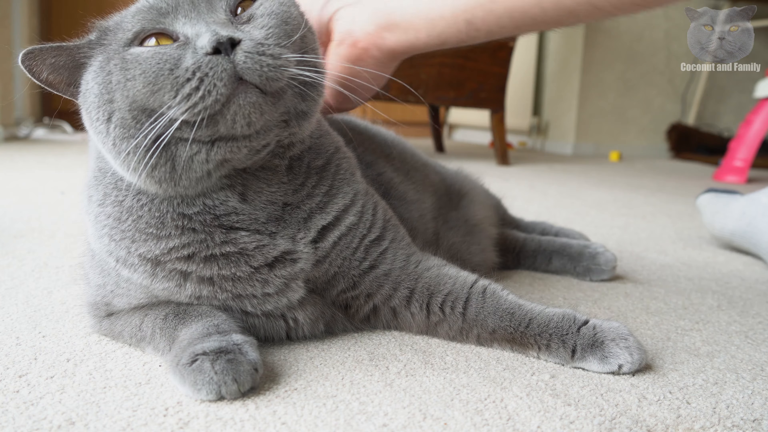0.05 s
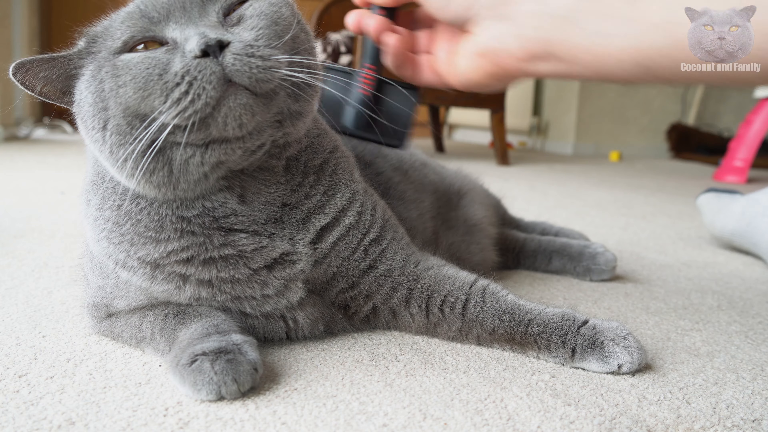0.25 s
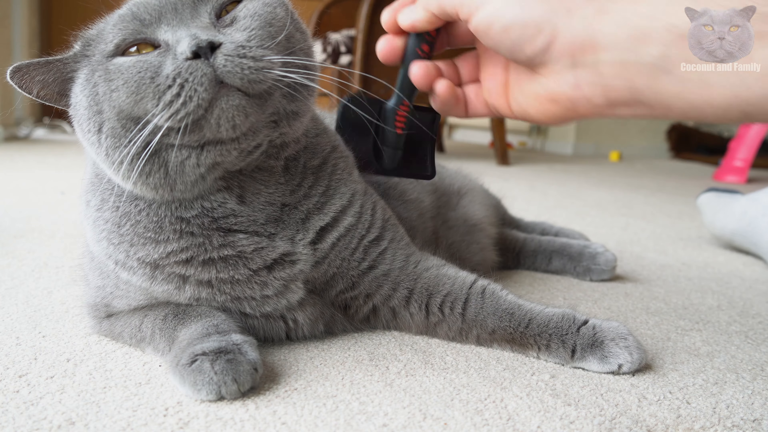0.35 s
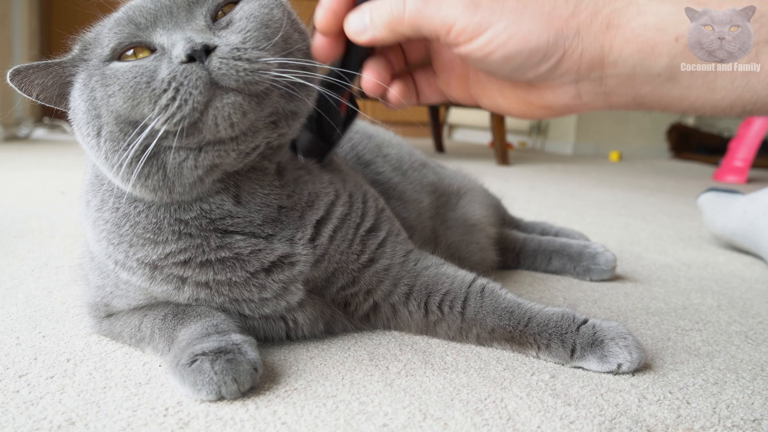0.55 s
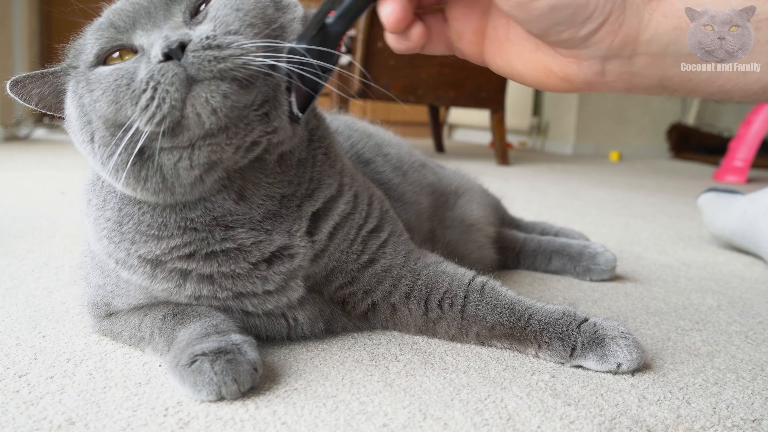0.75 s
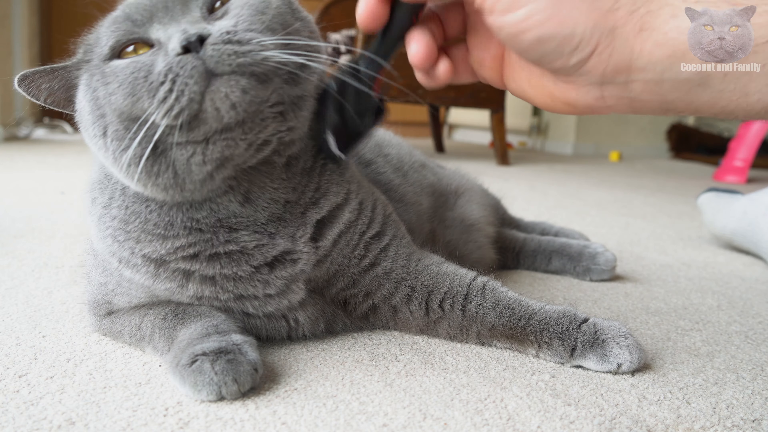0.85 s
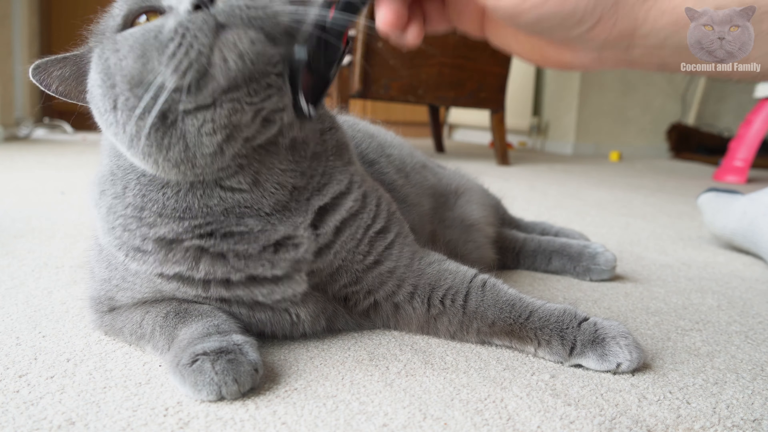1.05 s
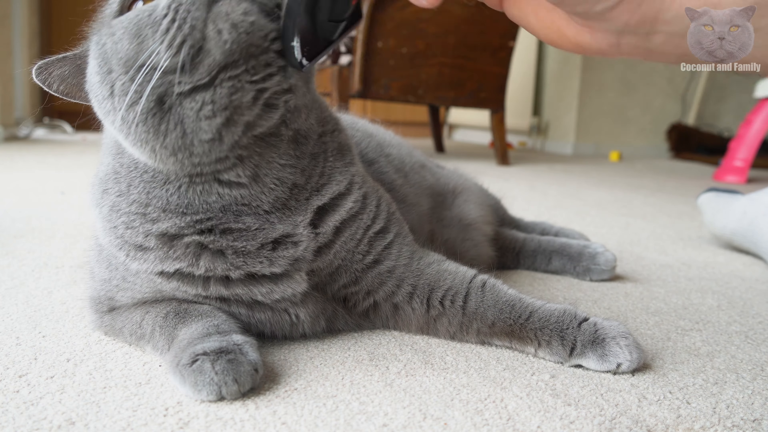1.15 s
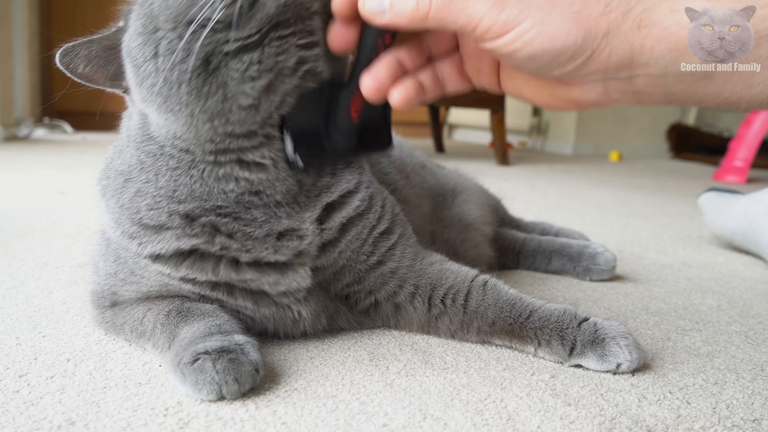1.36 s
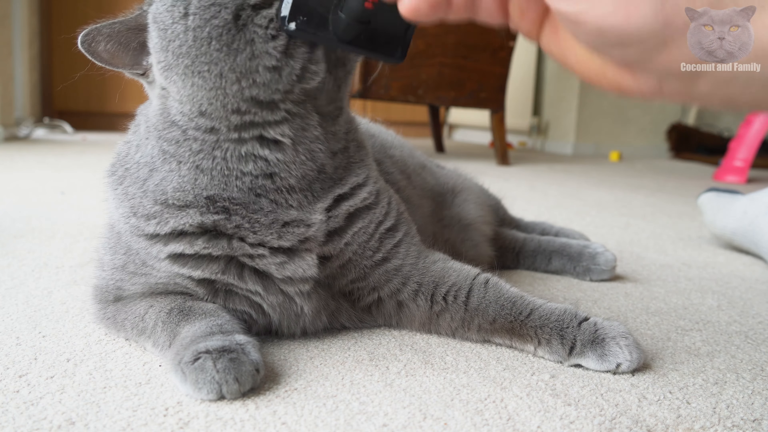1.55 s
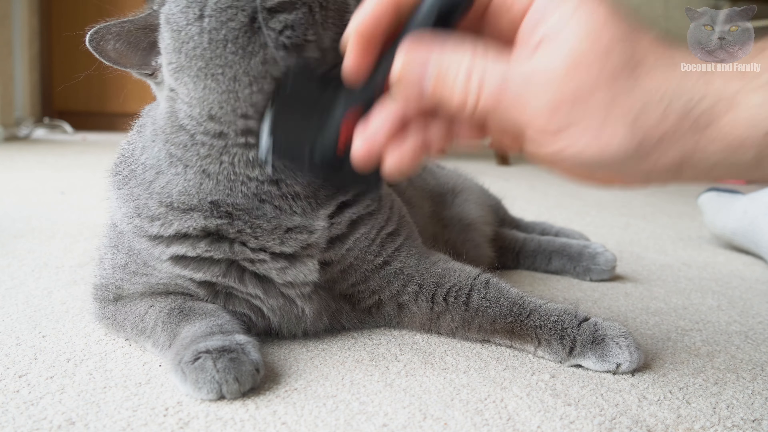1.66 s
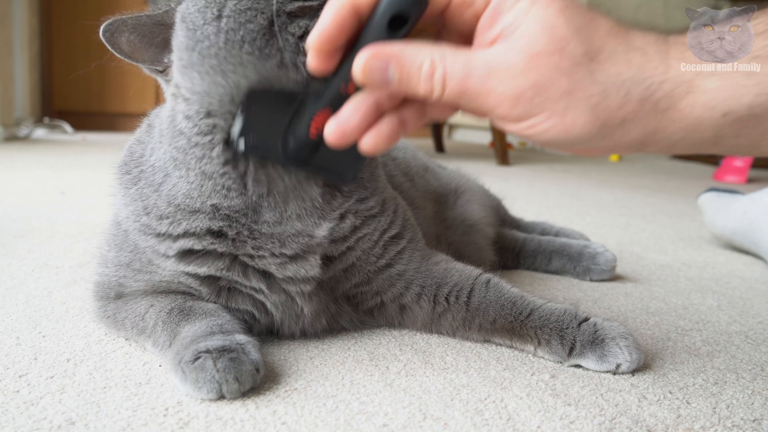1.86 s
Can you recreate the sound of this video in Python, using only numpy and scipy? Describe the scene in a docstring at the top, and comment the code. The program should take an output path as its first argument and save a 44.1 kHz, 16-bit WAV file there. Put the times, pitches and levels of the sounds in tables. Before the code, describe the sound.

A cat purrs close up, soft throbs turning rough and crackly, while a brush swishes through fur

```python
"""In a quiet room, a purring cat is brushed close to the microphone. The purr throbs softly as rounded low
pulses, fades, then turns round into a rougher half: each cycle there opens with one snap and closes with
another, amid flutter and a fine crackle. Bristles swish through the fur as swelling noise, the brush ticks
once, and a faint whistle wavers. The moving arm stirs a low rumble of filtered noise over steady hiss."""
import sys
import numpy as np
from scipy import signal
from scipy.fft import rfft, irfft
from scipy.io import wavfile
from scipy.ndimage import uniform_filter1d

SR = 44100
rng = np.random.default_rng(int(sys.argv[2]) if len(sys.argv) > 2 else 0)


def waveform_to_disk(signal):
    """Save audio, clipped to [-1, 1], as 16-bit WAV at the path in sys.argv[1]."""
    frames = np.transpose(np.atleast_2d(signal))
    scaled = np.clip(frames, -1, 1) * 32767
    samples = np.round(scaled).astype(np.int16)
    wavfile.write(sys.argv[1], SR, samples)


N = 83790  # samples in the scene

# Every colour table lists the points of a tone curve: pitch_hz, level_db

# Soft half of the purr, mean strength of the pushes: time_s, level_db
SOFT_LEVEL = [(0, -34), (.1, -32.5), (.2, -33), (.33, -38), (.455, -36), (.495, -44), (.535, -47),
              (.575, -64), (.66, -70), (.76, -45.5), (.86, -52), (.92, -48)]
# Soft push muffled by chest and fur: pitch_hz, level_db
SOFT_COLOUR = [(20, -15), (50, -7.5), (80, -5), (125, 1), (160, -4.5), (205, -10), (260, -16), (320, -23),
               (420, -38), (800, -77)]
SOFT_START_S, SOFT_END_S, SOFT_RATE_HZ = 0.02158, 1, 25.4

# Pace of the rough half of the purr: time_s, rate_hz
ROUGH_RATE = [(.94, 28.3), (1.02, 25.9), (1.13, 27.4), (1.23, 25.1), (1.29, 29.8), (1.46, 24.6),
              (1.57, 29.2), (1.7, 23.6), (1.79, 29.7), (1.84, 20.9)]
# Effort of the rough half: time_s, level_db, flutter_db (flutter relative to level_db)
ROUGH_EFFORT = [(.93, -40.5, -22), (1.0, -47, -10), (1.12, -42, -10.5), (1.26, -40, -5), (1.41, -44, -3.5),
                (1.55, -39.5, -6.5), (1.67, -35.5, -7.5), (1.8, -36.5, -18.5), (1.9, -39, -32)]
# Wait from the opening of the folds to their closing: time_s, wait_s
CLOSING_WAIT = [(.94, .014), (1.0, .02), (1.24, .0175), (1.29, .012), (1.48, .021), (1.6, .019),
                (1.68, .012), (1.72, .018), (1.76, .0135)]
# Ring of throat and chest after a closing snap: pitch_hz, level_db
THROAT_COLOUR = [(30, -35), (70, -10.5), (110, 4), (135, 2.5), (260, -4.5), (350, -11.5), (730, -19.5),
                 (1200, -26.5), (1800, -43), (3500, -57), (8000, -58)]
# Ring of the opening snap and the flutter: pitch_hz, level_db
FLUTTER_COLOUR = [(40, -26), (120, 1), (190, 2), (270, 4), (350, -8.5), (480, -13.5), (800, -27.5),
                  (1300, -24.5), (2000, -36), (6000, -68)]
# Low thump of each puff of air: pitch_hz, level_db
PUFF_COLOUR = [(25, -15), (60, -14.5), (110, 2.5), (170, 2), (260, -11), (500, -54), (1500, -93)]
ROUGH_START_S = .936
OPENING_DB, PUFF_DB = -8.5, -3  # relative to the effort
PUFF_LAG_S = 0.0036
SNAP_SCATTER_DB, FLUTTER_SCATTER_DB = 4.5, 2
FLUTTER_LAGS_S, FLUTTER_JITTER_S = (.007, .02, .025, .031), 0.00161

# Sharpest snaps of the larynx: start_s, crack_db, knock_db
SHARP_SNAPS = [(0.937, -38.5, -44.5), (.95, -52, -42.5), (0.968, -48, -56), (1.007, -50, -45),
               (1.047, -55, -39), (1.192, -44, -40.5), (1.276, -37.5, -53), (1.304, -59, -49.5),
               (1.38, -42.5, -45), (1.454, -44.5, -48), (1.516, -48, -51), (1.665, -53, -51),
               (1.681, -55, -43), (1.736, -45, -47), (1.795, -39.5, -47), (1.829, -33, -50),
               (1.874, -41, -48), (1.898, -37.5, -55)]
# Bright crack of a sharp snap: pitch_hz, level_db
CRACK_COLOUR = [(100, -20), (300, -1.5), (800, 9), (1600, 2), (2200, -18), (3500, -4), (5000, -45),
                (10000, -60)]
# Dull knock of a sharp snap: pitch_hz, level_db
KNOCK_COLOUR = [(50, -20), (170, -7.5), (300, 2), (400, -8), (600, -27), (1200, -21), (4000, -98)]

# Fine crackle in the rough purr, mean strength of the clicks: time_s, level_db
CRACKLE_LEVEL = [(.95, -66), (1.1, -59), (1.33, -52), (1.5, -48.5), (1.69, -50.5), (1.78, -51), (1.9, -44)]
# Ring of one crackle click: pitch_hz, level_db
CRACKLE_COLOUR = [(100, -22), (250, -8), (450, -1), (750, 6.5), (1000, -1.5), (1400, -7.5), (2200, -24),
                  (6000, -73)]
CRACKLE_RATE_HZ, CRACKLE_SCATTER_DB = 60, 2

# Brush strokes: fastest_s, rise_s, fall_s, hiss_db, rasp_db, rasp_hz (centre of the low rasp)
STROKES = [(.01, 0.039, 0.084, -59.5, -60, 1570), (.52, 0.14, 0.27, -67, -70, 1380),
           (.675, .015, 0.021, -75, -63, 2380), (.79, 0.033, 0.03, -61.5, -66, 2180),
           (1.169, 0.037, 0.031, -50.5, -56, 1420), (1.582, 0.047, 0.03, -51, -55, 1590),
           (1.7, 0.048, 0.032, -61.5, -74, 1700)]
# Hiss of bristles in fur: pitch_hz, level_db
BRISTLE_COLOUR = [(1200, -18), (2500, -13), (2950, -4.5), (3500, 1), (4200, -6), (5500, -10), (7000, -20.5),
                  (10000, -28), (15000, -35)]
RASP_STEP_OCTAVES = 0.44  # spacing of the points on the rasp's tone curve
GRAIN_DB, UNEVEN_DB = 1.5, .7  # spread of the fast and the slower wobble in level

# Plastic tick of the brush: pitch_hz, level_db
TICK_COLOUR = [(600, -40), (1600, 2), (2500, -9), (3800, -4), (5200, -3), (7000, -12), (9000, -28),
               (14000, -36)]
# Bright scuff around the tick: pitch_hz, level_db
SCUFF_COLOUR = [(1500, -32), (3000, 1), (4500, 3), (6200, -5), (8000, -15), (14000, -30)]
TICK_S, TICK_DB, TICK_DECAY_S = .255, -36.5, 0.001
SCUFF_DB, SCUFF_LENGTH_S = -57.5, 0.031

WHISTLE_S, WHISTLE_LENGTH_S, WHISTLE_HZ, WHISTLE_DB = .57, 0.099, 1350, -65

# Strength of the low rumble: time_s, level_db
RUMBLE_LEVEL = [(0, -37.5), (.1, -48), (.16, -34.5), (.22, -19.5), (.28, -29.5), (.325, -18), (.39, -31),
                (.44, -29), (.48, -48), (.53, -25.5), (.645, -46.5), (.715, -34), (.81, -49.5),
                (1.15, -46.5), (1.42, -58.5), (1.55, -52), (1.7, -66), (1.9, -51)]
# Air stirred at the microphone: pitch_hz, level_db
RUMBLE_COLOUR = [(5, -8), (12, -6.5), (19, -0.5), (30, -13), (50, -23.5), (70, -36), (120, -39), (300, -84)]
# Steady hiss of the room: pitch_hz, level_db
ROOM_COLOUR = [(25, -13), (60, 0), (120, -8.5), (225, -19), (546, -26), (1290, -28), (2490, -28),
               (3490, -26.5), (4500, -28.5), (8000, -30), (15500, -31.5)]
ROOM_DB = -51
TOP_HZ = 15700  # highest pitch the recorder lets through


def undb(db):
    """Decibels to gain."""
    return 10 ** (np.asarray(db) / 20)


def curve(table, t, column=1):
    """One column of a table, joined by straight lines in time."""
    rows = np.array(table)
    return np.interp(t, rows[:, 0], rows[:, column])


def gains(colour):
    """Gain at every frequency, joining the colour's points on a logarithmic pitch scale."""
    hz, db = np.array(colour).T
    bins_hz = np.arange(N // 2 + 1) * SR / N
    return undb(np.interp(np.log(bins_hz + 1), np.log(hz), db))


def noise(colour):
    """Coloured noise of rms 1."""
    x = irfft(rfft(rng.standard_normal(N)) * gains(colour), N)
    return x / x.std()


def walk(rate_hz):
    """Smooth chance with a spread of 1: random steps at the given rate, rounded off."""
    step = int(SR / rate_hz)
    steps = np.repeat(rng.standard_normal(N // step + 1), step)
    x = uniform_filter1d(steps, step)[:N]
    return x / x.std()


def pulses(times, db):
    """Single-sample pulses at the given times and levels."""
    at = (np.asarray(times) * SR).astype(int)
    return np.bincount(np.maximum(at, 0), undb(db), N)[:N]


def ring(x, colour):
    """Pass pulses through a body with the given colour; a unit pulse peaks at 1."""
    # Folding the cepstrum gives minimum phase: the body rings only after it is struck
    cepstrum = irfft(np.log(gains(colour)), N)
    cepstrum[1:N // 2] *= 2
    cepstrum[N // 2 + 1:] = 0
    response = irfft(np.exp(rfft(cepstrum)), N)
    return signal.fftconvolve(x, response / np.abs(response).max())[:N]


def soft_purr():
    """Rounded, even pushes of the larynx, muffled by chest and fur."""
    times = np.arange(SOFT_START_S, SOFT_END_S, 1 / SOFT_RATE_HZ)
    scatter_db = rng.standard_normal(len(times))
    pushes = pulses(times, curve(SOFT_LEVEL, times) + scatter_db)
    # A symmetrical response swells before each push as it fades after it
    response = np.roll(irfft(gains(SOFT_COLOUR), N), N // 2)
    return -signal.fftconvolve(pushes, response / response.max(), "same")


def rough_purr():
    """Each cycle the folds snap open, let a puff through, flutter and snap shut."""
    times = [ROUGH_START_S]
    while times[-1] < N / SR:
        times.append(times[-1] + 1 / curve(ROUGH_RATE, times[-1]))
    times = np.array(times)
    effort_db = curve(ROUGH_EFFORT, times)
    flutter_db = effort_db + curve(ROUGH_EFFORT, times, column=2)

    def chance():
        return rng.standard_normal(len(times))

    opening = pulses(times, effort_db + OPENING_DB + SNAP_SCATTER_DB * chance())
    closing_times = times + curve(CLOSING_WAIT, times)
    closing = pulses(closing_times, effort_db + SNAP_SCATTER_DB * chance())
    puffs = pulses(times + PUFF_LAG_S, effort_db + PUFF_DB)
    flutter = np.zeros(N)
    for lag_s in FLUTTER_LAGS_S:
        flutter_times = times + lag_s + FLUTTER_JITTER_S * chance()
        flutter += pulses(flutter_times, flutter_db + FLUTTER_SCATTER_DB * chance())
    low = ring(closing, THROAT_COLOUR) + ring(puffs, PUFF_COLOUR)
    return -low - ring(opening + flutter, FLUTTER_COLOUR)


def sharp_snaps():
    """The sharpest snaps of the larynx: a bright crack and a dull knock of opposite polarity."""
    times, crack_db, knock_db = np.array(SHARP_SNAPS).T
    cracks = ring(pulses(times, crack_db), CRACK_COLOUR)
    knocks = ring(pulses(times, knock_db), KNOCK_COLOUR)
    return cracks - knocks


def crackle():
    """Small irregular clicks among the snaps of the rough purr, one at random in each time slot."""
    slots = np.arange(N // 100)
    times = ROUGH_START_S + (slots + rng.random(len(slots))) / CRACKLE_RATE_HZ
    chance = np.sqrt(12) * (rng.random(len(slots)) - .5)  # even chance with a spread of 1
    db = curve(CRACKLE_LEVEL, times) + CRACKLE_SCATTER_DB * chance
    return -ring(pulses(times, db), CRACKLE_COLOUR)


def brush(t):
    """Each stroke swells and fades: a grainy hiss of bristles and, when pressed in, a lower rasp."""
    strokes = np.zeros(N)
    hiss = noise(BRISTLE_COLOUR)
    for fastest_s, rise_s, fall_s, hiss_db, rasp_db, rasp_hz in STROKES:
        width_s = np.where(t < fastest_s, rise_s, fall_s)
        speed = np.exp(-.5 * ((t - fastest_s) / width_s) ** 2)
        # The rasp is a hump of noise falling away on both sides of its centre
        hump = [(rasp_hz * 2 ** (k * RASP_STEP_OCTAVES), -6 * abs(k) ** 1.5) for k in range(-4, 5)]
        strokes += speed * (undb(hiss_db) * hiss + undb(rasp_db) * noise(hump))
    return strokes * undb(GRAIN_DB * walk(300) + UNEVEN_DB * walk(39.5))


def tick(t):
    """One small plastic tick of the brush, a dying burst of noise inside a brief bright scuff."""
    since = t - TICK_S
    click = (since > 0) * np.exp(-np.abs(since) / TICK_DECAY_S) * undb(TICK_DB) * noise(TICK_COLOUR)
    scuff = np.exp(-(since / SCUFF_LENGTH_S) ** 2) * undb(SCUFF_DB) * noise(SCUFF_COLOUR)
    return click + scuff


def whistle(t):
    """A very faint sine of wavering pitch that swells and fades while the purr rests."""
    pitch_hz = WHISTLE_HZ * (1 + .008 * walk(78.2))
    phase = 2 * np.pi * np.cumsum(pitch_hz) / SR
    swell = np.exp(-((t - WHISTLE_S) / WHISTLE_LENGTH_S) ** 2)
    return undb(WHISTLE_DB) * swell * np.sin(phase)


def rumble(t):
    """Air stirred at the microphone by the moving arm: low noise of changing level."""
    return undb(curve(RUMBLE_LEVEL, t)) * noise(RUMBLE_COLOUR)


def room():
    """Steady hiss of the room: coloured noise at a constant level."""
    return undb(ROOM_DB) * noise(ROOM_COLOUR)


def scene():
    """Cat, brush and room at one microphone."""
    t = np.arange(N) / SR
    cat = soft_purr() + rough_purr() + sharp_snaps() + crackle()
    grooming = brush(t) + tick(t)
    background = whistle(t) + rumble(t) + room()
    return (cat + grooming + background)[None]


def record(dry):
    """The recorder cuts the top with a steep low-pass filter."""
    low_pass = signal.ellip(10, .2, 80, TOP_HZ, fs=SR, output="sos")
    return signal.sosfilt(low_pass, dry)


dry = scene()
out = record(dry)
waveform_to_disk(out)
```